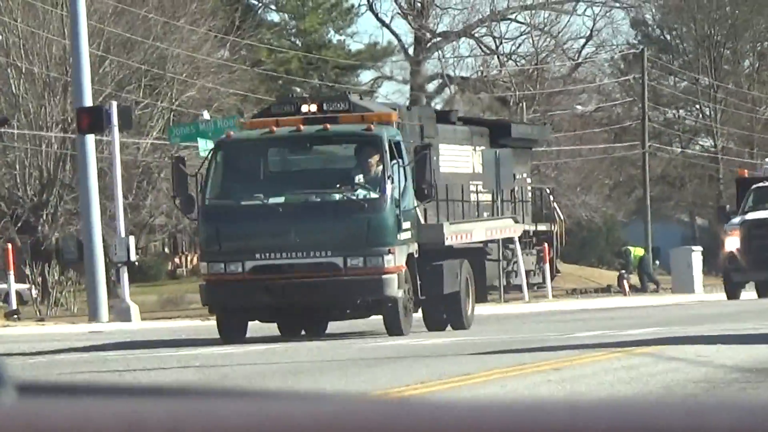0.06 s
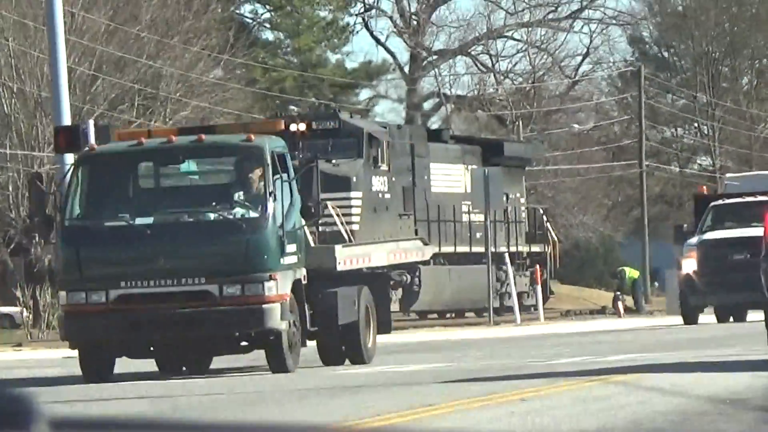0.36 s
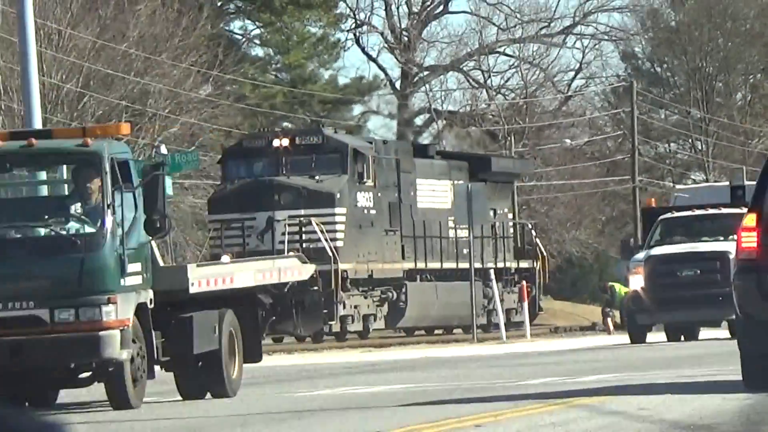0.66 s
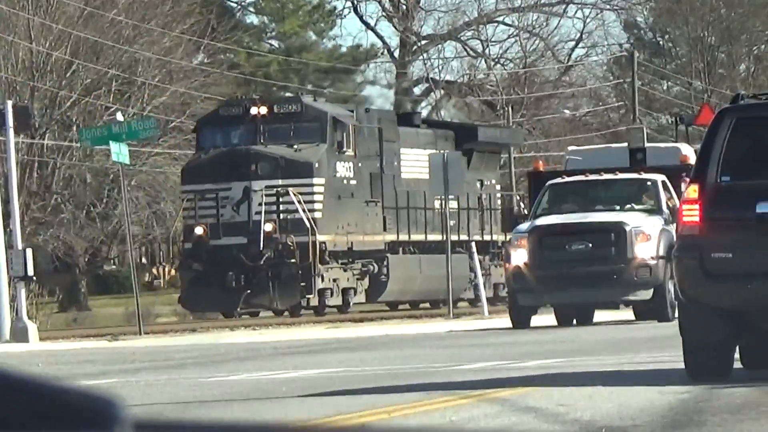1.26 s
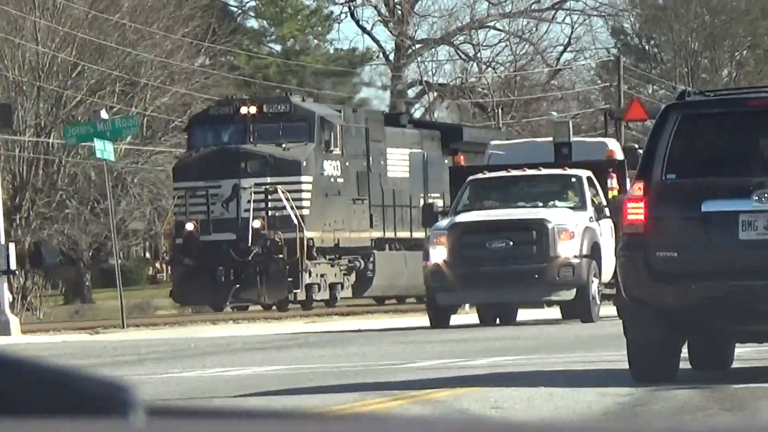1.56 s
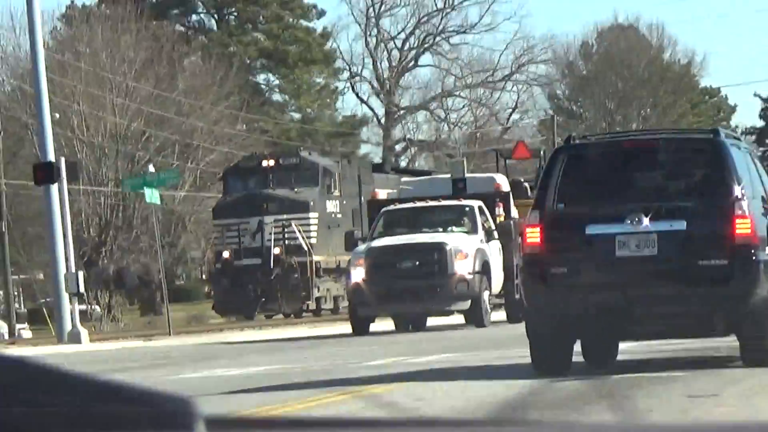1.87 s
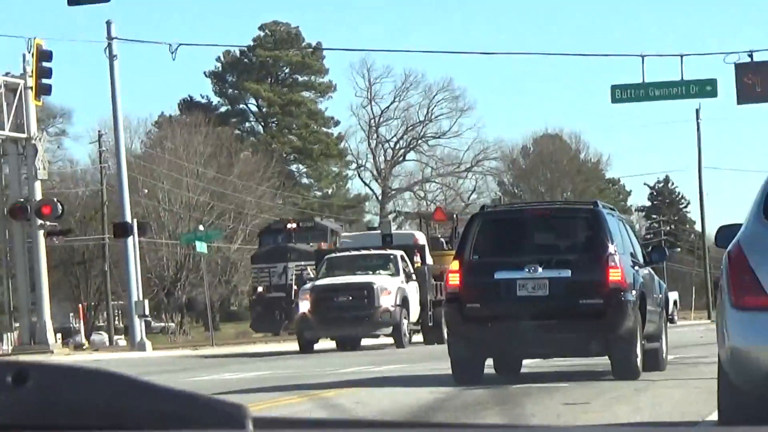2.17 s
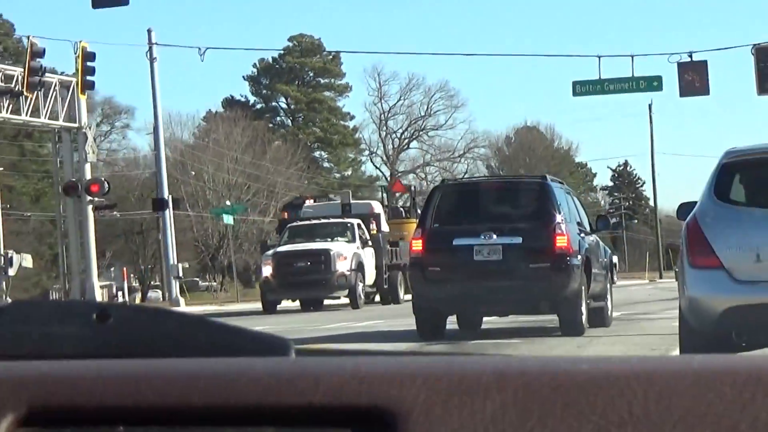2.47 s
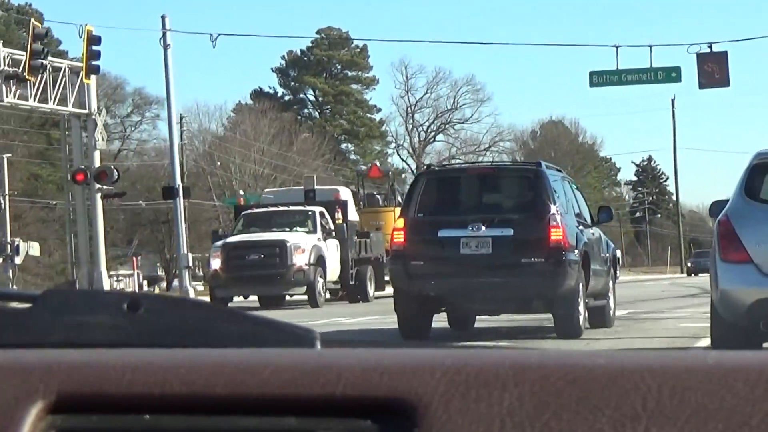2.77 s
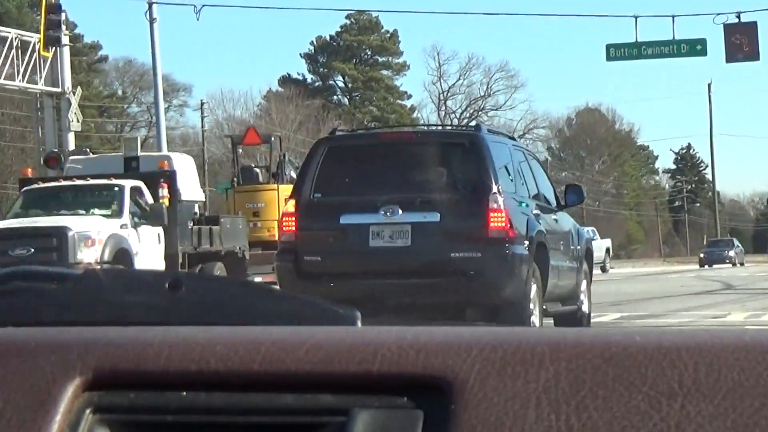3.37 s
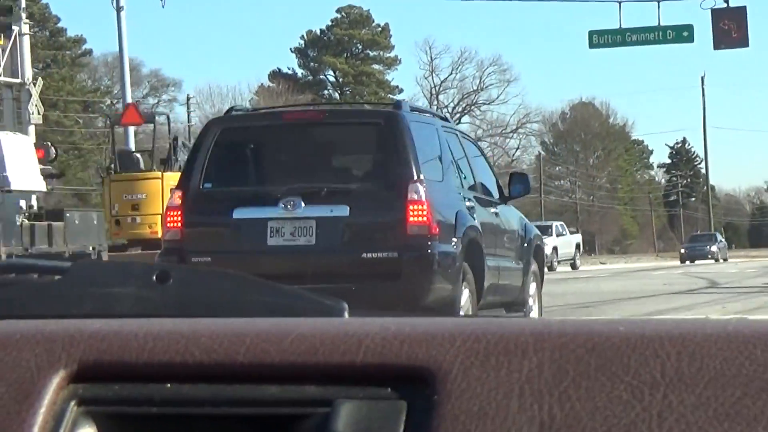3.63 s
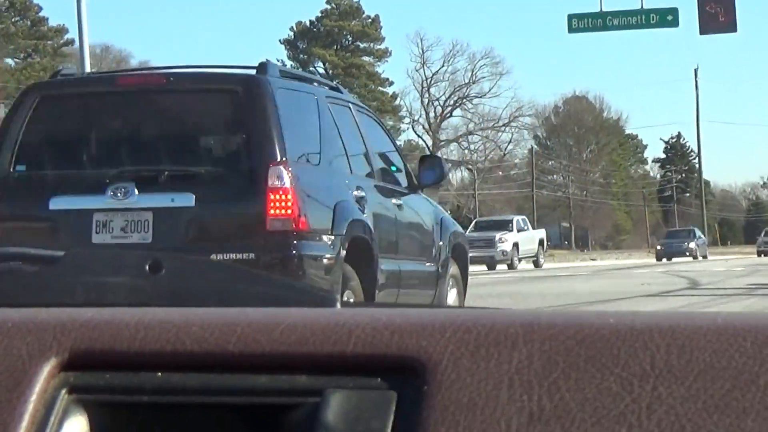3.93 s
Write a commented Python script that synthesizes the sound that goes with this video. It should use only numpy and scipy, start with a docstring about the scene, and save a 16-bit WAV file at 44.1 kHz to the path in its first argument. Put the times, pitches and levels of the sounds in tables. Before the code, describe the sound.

A car engine hums low inside the cabin, revving up and shifting gear over road rumble.

```python
"""Front seat of a car in traffic, heard close on the microphone of a hand-held camera.
From the start, tyres rumble through the floor, traffic hisses through the glass, and camera and trim tick.
The four-cylinder engine booms in the cabin and revs up; just before 2 s it shifts up, as the lens whirs.
Then a faint gear whine climbs with road speed and fingers brush the camera twice.
In the last second the lens motor runs again while the engine pulls on."""
import sys
import numpy as np
from scipy import signal
from scipy.fft import rfft, irfft
from scipy.io import wavfile
from scipy.ndimage import uniform_filter1d, map_coordinates

SR = 44100
rng = np.random.default_rng(int(sys.argv[2]) if len(sys.argv) > 2 else 0)


def wav_out(sig):
    """Save sig, one row per channel (or a flat mono array), as 16-bit PCM at SR to the path in sys.argv[1]."""
    wavfile.write(sys.argv[1], SR, np.round(np.clip(np.atleast_2d(sig).T, -1, 1) * 32767).astype(np.int16))


N = 176400

# engine speed and cabin boom: t/s, firing rate/Hz, level at that rate/dB, level an octave up/dB
ENGINE = [(0.0, 77.4, -13.3, -20.3), (0.15, 79.6, -12.6, -22.5), (0.4, 84.0, -11.4, -24.4),
          (0.9, 91.1, -10.6, -33.0), (1.15, 95.0, -10.1, -31.4), (1.45, 99.2, -11.0, -29.8),
          (1.64, 97.7, -10.7, -30.1), (1.76, 89.8, -11.4, -33.0), (1.9, 76.7, -14.8, -20.4),
          (2.02, 71.8, -17.1, -15.8), (2.2, 71.2, -17.3, -14.7), (2.65, 74.2, -15.3, -16.0),
          (3.1, 74.2, -16.0, -16.0), (3.5, 76.5, -14.9, -17.9), (3.85, 78.3, -13.3, -20.3),
          (4.0, 79.7, -12.0, -21.6)]
# response of the plastic shell, rung by ticks and lens motor: f/Hz, relative level/dB
SHELL = [(400, -10), (900, 5.5), (2000, 1.5), (4000, 0.5), (6200, 0), (7600, -7), (9800, -9),
         (12000, -14.5), (15500, -23.5)]


def undb(db):
    """Decibels to gain."""
    return 10 ** (np.asarray(db) / 20)


def unit(x):
    """Scale to rms 1."""
    return x / np.sqrt(np.mean(x ** 2))


def times():
    """Time of every sample in seconds."""
    return np.arange(N) / SR


def curve(points):
    """Join (t/s, value) points by straight lines."""
    return np.interp(times(), *np.array(points, float).T)


def colour(x, points):
    """Filter by a curve of (f/Hz, gain/dB) points."""
    hz, db = np.array(points, float).T
    f = np.maximum(np.fft.rfftfreq(x.shape[-1], 1 / SR), 1)
    gain = undb(np.interp(np.log(f), np.log(hz), db))
    return irfft(rfft(x) * gain, x.shape[-1])


def drift(rate_hz):
    """Smooth random drift of rms 1."""
    step = max(int(SR / rate_hz), 1)
    path = np.interp(np.arange(N) / step, np.arange(1024), rng.standard_normal(1024))
    return unit(uniform_filter1d(path, step))


def spread(mid, side):
    """Mid and side to left and right, as wide as the cabin makes each band."""
    # stereo width at the microphone: f/Hz, side gain/dB
    width = [(30, -15), (120, -11), (250, -4.5), (500, -8), (1000, -5.5), (2000, -6), (4000, -9),
             (8000, -7.5), (13000, -17.5)]
    return mid + colour(side, width) * np.array([[1], [-1]])


def noise(points):
    """Stereo noise of a given colour, rolled off above its last point."""
    f = np.fft.rfftfreq(N, 1 / SR)
    roll_off = 1 / np.sqrt(1 + (f / points[-1][0]) ** 8)
    coloured = (colour(rng.standard_normal(N), points) for _ in range(2))
    mid, side = (unit(irfft(rfft(x) * roll_off, N)) for x in coloured)
    return spread(mid, side)


def road(rumble_rise_db_per_s=.4, hiss_rise_db_per_s=.54):
    """Tyres below and traffic outside swell slowly as the car gathers speed."""
    # tyre rumble through the floor: f/Hz, relative spectral level/dB
    tyres = [(12, -13), (24, -1), (32, -6.5), (43, 4), (60, -2.5), (115, 0.5), (180, -7), (270, -12),
             (370, -12), (500, -20), (900, -34)]
    # traffic and tyre hiss through the glass: f/Hz, relative spectral level/dB
    traffic = [(300, -4), (520, -2), (740, -2.5), (1080, -10), (1600, -14), (2700, -19), (3800, -26.5),
               (6400, -31.5), (7400, -36.5), (9600, -37), (12000, -43), (15500, -47)]
    t = times() - times().mean()
    rumble = noise(tyres) * undb(-28.5 + rumble_rise_db_per_s * t + .55 * drift(2.6))
    hiss = noise(traffic) * undb(-42.5 + hiss_rise_db_per_s * t + .86 * drift(40) + .4 * drift(3.4))
    return rumble + hiss


def brushes(fade_s=.01):
    """Skin slides over the camera, right by the microphone, with a thin, uneven hiss."""
    # finger strokes: t/s, length/s, level/dB
    strokes = [(2.69, 0.059, -70), (2.813, 0.079, -65.5)]
    # skin rubbing on the camera: f/Hz, relative spectral level/dB
    friction = [(4000, -33), (8800, -8), (9500, 0.5), (11200, -5), (12200, -2), (12800, -16), (15000, -31)]
    t = times()
    touch = sum(undb(db) * np.clip(np.minimum(t - start, start + length - t) / fade_s, 0, 1)
                for start, length, db in strokes)
    return noise(friction) * touch * undb(2 * drift(120))


def lens_motor(sag_per_s=.028):
    """The lens motor runs by the microphone: a grainy whir, and narrow gear resonances that sag a little."""
    # motor runs: start/s, end/s, ramp/s, whine level/dB, whir level/dB
    runs = [(1.8, 2.05, 0.054, -75, -60.5), (3.019, 3.972, 0.24, -57, -60)]
    # resonances of its gears: f/Hz, width/Hz, relative level/dB
    modes = [(2300, 200, 2.5), (4400, 220, -5), (5800, 130, 2), (6050, 100, -5.5), (8700, 220, -13.5),
             (9400, 280, -13.5), (10000, 180, -14.5), (10990, 130, -17.5)]
    t, f = times(), np.fft.rfftfreq(N, 1 / SR)
    response = sum(undb(db) / np.sqrt(width) / (1 + (2 * (f - hz) / width) ** 2)
                   for hz, width, db in modes)
    whine = unit(irfft(rfft(rng.standard_normal(N)) * response, N))
    whir = noise(SHELL) * undb(1.5 * drift(90))
    out = 0
    for start, end, ramp_s, whine_db, whir_db in runs:
        running = np.clip(np.minimum(t - start, end - t) / ramp_s, 0, 1)
        speed = 1 - sag_per_s * (t - (start + end) / 2)
        sagging = map_coordinates(whine, [np.cumsum(speed)], mode="mirror")
        out = out + running * (undb(whine_db) * sagging + undb(whir_db) * whir)
    return out


def tick(db, peak_hz, slope_db, decay_s, attack_s=.0004):
    """A brief crack dies away in the plastic shell, its spectrum weighted towards one frequency."""
    t = np.arange(4096) / SR
    spectrum = [(hz, level - slope_db * abs(np.log2(hz / peak_hz))) for hz, level in SHELL]
    mid, side = (unit(colour(rng.standard_normal(len(t)), spectrum)) for _ in range(2))
    envelope = np.minimum(t / attack_s, 1) * np.exp(-t / decay_s)
    return spread(mid, side) * undb(db) * envelope


def ticks(faint_count=36):
    """Camera and trim tick close by, with fainter ticks scattered at random between the clear ones."""
    # clear ticks: t/s, level/dB, emphasis f/Hz, fall either side/(dB per octave), decay/s
    clear = [(.088, -52.5, 4020, 2, 0.017), (0.321, -63.5, 8900, 16, 0.0055), (.602, -50.5, 8000, 2, .003),
             (0.751, -45, 3500, 3, 0.0042), (1.099, -52, 2970, 20, 0.0059), (1.303, -48.5, 4500, 28, .003),
             (1.767, -38.5, 5030, 0.5, 0.0043), (1.804, -46.5, 5060, 10, 0.0044),
             (1.83, -44, 4000, 6, 0.0076), (1.861, -37, 1810, 5.5, 0.0057), (1.874, -37.5, 850, 22, 0.019),
             (1.913, -48, 4000, 6, 0.0056), (1.944, -53, 5030, 2, 0.0037), (2.042, -52, 11000, 6, 0.0034),
             (2.46, -50, 5000, 6.5, .004), (2.564, -41.5, 4270, 5, 0.0022), (2.629, -44, 9300, 31, .0015),
             (2.653, -51, 3780, 8, 0.0054), (2.686, -41, 9000, 9, 0.00094),
             (2.946, -39.5, 3700, 10.5, 0.0021), (3.04, -52, 9000, 14, .004), (3.311, -44, 6000, 0.5, .009)]
    faint = [(when * N / SR, -59 + 7 * force, 4000 + 4000 * brightness, 6, .002)
             for when, force, brightness in rng.random((faint_count, 3))]
    out = np.zeros((2, N))
    for start_s, *shape in clear + faint:
        i = int(start_s * SR)
        sound = tick(*shape)[:, :N - i]
        out[:, i:i + sound.shape[1]] += sound
    return out


def high_gear(shift_s=1.85, length_s=.25):
    """0 in the low gear, rising to 1 through the shift."""
    return np.clip((times() - shift_s) / length_s + .5, 0, 1)


def gear_whine(mesh_start_hz=713, speed_gain_per_s=.19):
    """The meshing teeth of the high gear sing faintly, rising in pitch with road speed."""
    # two swells of the whine: t/s, level/dB
    swells = [(1.9, -64.5), (2.15, -58), (2.6, -54), (3.2, -61), (3.6, -55), (3.9, -66.5)]
    mesh_hz = mesh_start_hz * (1 + speed_gain_per_s * times()) * (1 + .003 * drift(25))
    phase = 2 * np.pi * np.cumsum(mesh_hz) / SR
    amplitude = np.sqrt(2) * high_gear() * undb(curve(swells) + 1.5 * drift(10))
    return spread(amplitude * np.cos(phase), amplitude * np.cos(phase + 2 * drift(2)))


def growl(firing_hz, firings, cylinder_scatter=.55, firing_scatter=.31, decay_s=.036):
    """Four unequal cylinders knock the body panels, harder at high revs."""
    # response of the body panels: f/Hz, relative level/dB
    panels = [(100, -23.5), (200, -13.5), (290, -5.5), (380, -1.5), (480, -2.5), (580, -0.5), (750, 2),
              (1100, -22.5), (2000, -31.5), (4000, -50.5)]
    onsets = np.flatnonzero(np.diff(np.floor(firings)) > 0)
    strength = 1 + cylinder_scatter * np.array([1, -1, 0, 0])[np.arange(len(onsets)) % 4]
    knocks = np.zeros(N)
    knocks[onsets] = strength + firing_scatter * rng.standard_normal(1024)[:len(onsets)]
    rings = rng.standard_normal((2, 4096)) * np.exp(-np.arange(4096) / SR / decay_s)
    mid, side = (unit(colour(signal.fftconvolve(knocks, ring)[:N], panels)) for ring in rings)
    rev_octaves = np.log2(firing_hz / firing_hz.mean())
    return spread(mid, side) * undb(-44.5 + 8.5 * rev_octaves)


def orders(firings, waver_db=3):
    """The weaker engine orders waver; their balance changes with the gear."""
    # orders before the load gain: multiple of the firing rate, low-gear level/dB, high-gear level/dB
    partials = [(.5, -46.5, -40.5), (1.5, -53, -39.5), (2.5, -46, -55), (2.75, -43.5, -55.5), (3, -42, -32),
                (3.25, -47.5, -59.5), (3.5, -43, -56), (4, -42.5, -49), (4.25, -44, -52), (4.5, -45, -56),
                (5, -47.5, -39), (6, -48.5, -54), (6.25, -50.5, -61), (7, -52.5, -53.5), (10, -61, -55.5),
                (12, -74, -62.5), (16.15, -61.5, -76.5)]
    gear, mid, side = high_gear(), 0, 0
    for multiple, low_db, high_db in partials:
        amplitude = np.sqrt(2) * undb(low_db + (high_db - low_db) * gear + waver_db * drift(6.2))
        phase = 2 * np.pi * (multiple * firings + rng.random()) + .35 * drift(12)
        mid = mid + amplitude * np.cos(phase)
        side = side + amplitude * np.cos(phase + 2 * np.pi * rng.random() + drift(.9))
    return spread(mid, side)


def boom(firing_hz, firings, left_lag_s=.00055, waver_db=.15):
    """The firing rate and its octave resonate in the cabin air, a little louder and later on the left."""
    t, _, fundamental_db, octave_db = np.array(ENGINE).T
    pan = np.array([[.5], [-.5]])
    cycles = firings - firing_hz * left_lag_s * pan
    out = 0
    for harmonic, db, pan_db in ((1, fundamental_db, .85), (2, octave_db, 3.5)):
        level_db = np.interp(times(), t, db) + waver_db * drift(12) + pan_db * pan
        out = out + np.sqrt(2) * undb(level_db) * np.cos(2 * np.pi * harmonic * cycles)
    return out


def engine(speed_jitter=.003):
    """The engine, just ahead of the seat: one speed curve drives its boom, orders and growl."""
    # engine load, which lifts the orders and the growl: t/s, gain/dB
    load = [(0, -1.5), (.3, -3.5), (1.0, 0.5), (1.45, -2.5), (1.72, 2.5), (1.95, 1), (2.2, -9.5),
            (2.6, -0.5), (3.1, -0.5), (4, 0)]
    t, rate_hz = np.array(ENGINE).T[:2]
    firing_hz = np.interp(times(), t, rate_hz) * (1 + speed_jitter * drift(25))
    firings = np.cumsum(firing_hz) / SR + 1 / 4  # running count: one cycle per firing
    return boom(firing_hz, firings) + undb(curve(load)) * (orders(firings) + growl(firing_hz, firings))


def scene():
    """Everything that reaches the microphone at the front seat."""
    return engine() + gear_whine() + road() + ticks() + brushes() + lens_motor()


def record(dry):
    """The camera cuts the treble steeply above 15.7 kHz."""
    low_pass = signal.ellip(8, .2, 70, 15700, fs=SR, output="sos")
    return signal.sosfilt(low_pass, dry)


dry = scene()
out = record(dry)
wav_out(out)
```